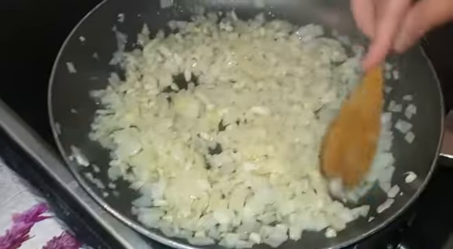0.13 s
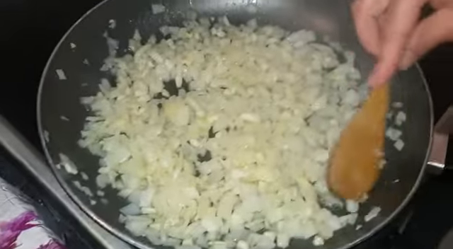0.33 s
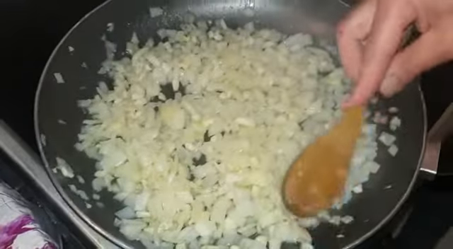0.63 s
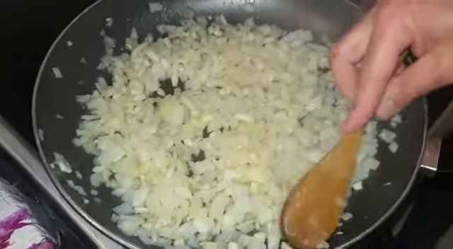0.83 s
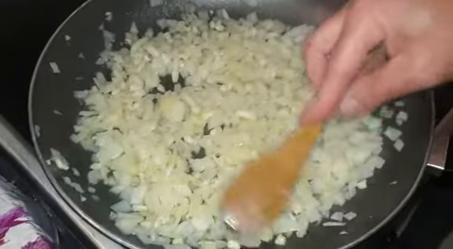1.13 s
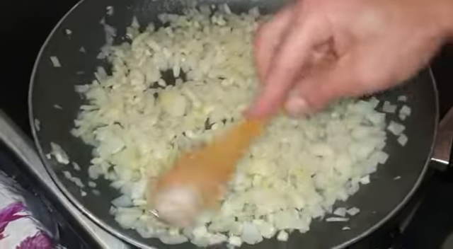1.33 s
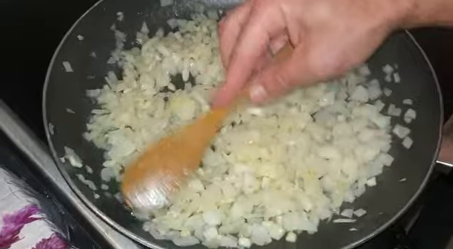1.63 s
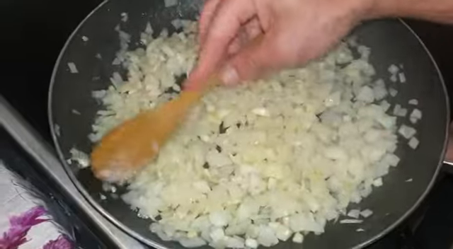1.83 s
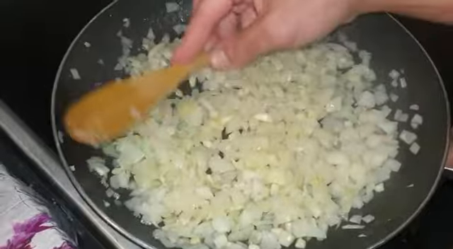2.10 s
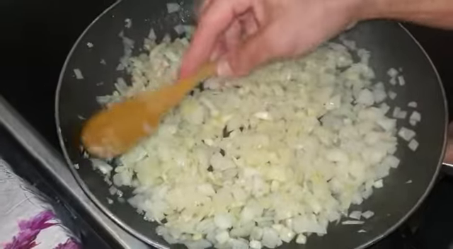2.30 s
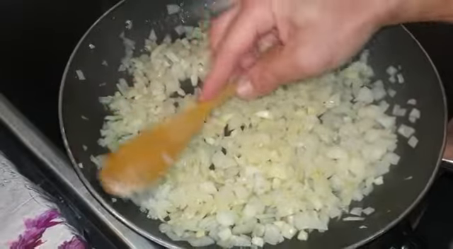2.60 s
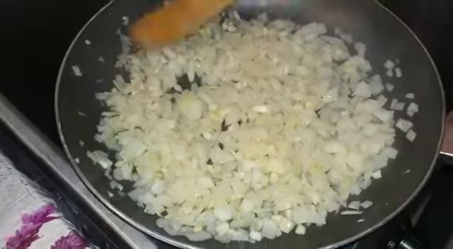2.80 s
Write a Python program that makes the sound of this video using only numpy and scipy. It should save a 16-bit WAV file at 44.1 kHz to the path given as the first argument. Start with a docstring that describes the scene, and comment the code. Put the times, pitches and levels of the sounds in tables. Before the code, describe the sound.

Steady woody knocks on a non-stick pan, soft at first, strongest near the middle, then duller and more rattling; faint steady sizzle and deep rumble beneath, close in a small live room, left channel muffled and very quiet.

```python
"""Spoon knocking on a pan of sizzling onion

A wooden spoon knocks on a heavy non-stick pan of chopped onion, moving round the rim, in a small kitchen.
Knocks: chattering touches excite decaying sines; decaying noise is their reverberation.
Sizzle: random clicks plus hiss, coloured. Rumble: coloured low noise plus a deep hum.
The left microphone is muffled: far quieter and duller.
"""
import sys
import numpy as np
from scipy import signal
from scipy.fft import rfft, irfft
from scipy.io import wavfile

SR = 44100
rng = np.random.default_rng(int(sys.argv[2]) if len(sys.argv) > 2 else 0)


def elevation(decibels):
    """Turn decibel levels (scalar or array-like) into linear amplitude ratios."""
    levels = np.asarray(decibels, float)
    return 10 ** (levels / 20)


def wav_record(signal):
    """Record a signal, one row per channel, as 16-bit PCM in the file named by sys.argv[1]."""
    frames = np.transpose(np.atleast_2d(signal))
    bounded = np.clip(frames, -1, 1)
    # unit amplitude maps onto the largest positive 16-bit level
    quanta = np.round(bounded * 32767).astype(np.int16)
    wavfile.write(sys.argv[1], SR, quanta)


N = 130095   # samples


def rms_one(x):
    """Scale to rms 1."""
    return x / np.sqrt(np.mean(x ** 2) + 1e-20)


def in_time(rows):
    """Read a (time_s, value) table at every sample."""
    time_s, value = np.transpose(rows)
    return np.interp(np.arange(N) / SR, time_s, value)


def at_hz(points, hz):
    """Read a (freq_hz, value) table on a log-frequency axis."""
    freq_hz, value = np.transpose(points)
    return np.interp(np.log(hz), np.log(freq_hz), value)


def drift(rate_hz):
    """Slow random curve of rms 1: noise through a two-pole low-pass, computed every 40 samples."""
    pole = np.exp(-80 * np.pi * rate_hz / SR)
    noise = rng.standard_normal(N // 40 + 2002)
    slow = signal.lfilter([1], [1, -2 * pole, pole * pole], noise)[2000:]   # drop the run-in
    return np.interp(np.arange(N) / 40, np.arange(len(slow)), rms_one(slow))


def steady(source, spectrum, patchy_db):
    """Colour a source; the left gets a muffled, partly alike copy. Right has rms 1 before level drift."""
    # muffling of the left microphone: freq_hz, gain_db
    left_loss = [(25, -19), (60, -28), (270, -27), (450, -20), (1200, -22), (2000, -27), (3300, -31),
                 (5500, -43), (8300, -48), (9200, -25), (10500, -14), (11500, -15), (12000, -42),
                 (13500, -35), (16000, -33)]
    # likeness of left to right: freq_hz, correlation (0-1)
    likeness = [(30, 0.34), (70, 0.23), (150, 0.68), (500, 0.16), (2000, 0.09), (8000, 0.022)]
    cutoff_hz = 15850
    hz = np.maximum(np.arange(N // 2 + 1) * SR / N, 1)
    shape = elevation(at_hz(spectrum, hz)) * (hz < cutoff_hz)
    right = rfft(source)
    other = rfft(rng.standard_normal(N))
    alike = np.clip(at_hz(likeness, hz), 0, 1)
    left = (alike * right + np.sqrt(1 - alike ** 2) * other) * elevation(at_hz(left_loss, hz))
    both = irfft(np.array([left, right]) * shape, N)
    return both / both[1].std() * elevation(patchy_db * drift(rate_hz=5.3))


def sizzle():
    """Dense tiny bursts of steam in the fat: random clicks on a smooth hiss."""
    # right-side level before output gain: time_s, level_db
    sizzle_level = [(0, -57), (.8, -56.5), (1.6, -57), (2.0, -52), (2.5, -52.5), (2.95, -52)]
    # relative spectrum: freq_hz, density_db_per_hz
    sizzle_spectrum = [(760, -11), (1300, -15.5), (1590, -10), (1780, -7.5), (1980, -7), (2130, -3.5),
                       (2320, -9.5), (2470, -8), (6420, -1), (8430, -12.5), (10200, -9.5), (14900, -8.5),
                       (16000, -18)]
    crackles_per_s, spread_db = 5100, 2
    crackle_share = 0.45   # of power
    size_db = spread_db * np.minimum(rng.exponential(1, N), 5)
    sizes = elevation(size_db) * rng.choice([-1, 1], N)
    crackle = rms_one(sizes * (rng.random(N) < crackles_per_s / SR))
    hiss = rng.standard_normal(N)
    source = np.sqrt(crackle_share) * crackle + np.sqrt(1 - crackle_share) * hiss
    return elevation(in_time(sizzle_level)) * steady(source, sizzle_spectrum, patchy_db=.2)


def rumble():
    """Flame and house: coloured low noise of uneven level, with a faint deep sine hum."""
    # right-side level before output gain: time_s, level_db
    rumble_level = [(0, -56.5), (.7, -55), (1.5, -52.5), (1.95, -48.5), (2.4, -53.5), (2.95, -50.5)]
    # relative spectrum: freq_hz, density_db_per_hz
    rumble_spectrum = [(30, -62), (42, -33), (54, -14), (64, -1.5), (76, -1), (92, -8), (124, -12),
                       (160, -22), (250, -21.5), (394, -38), (650, -36), (1100, -42.5), (1600, -54),
                       (2200, -59), (3300, -120)]
    hum_hz, hum_rms_db, hum_left_db = 28.8, -70, -31   # left relative to right
    phase = 2 * np.pi * hum_hz * np.arange(N) / SR + rng.uniform(0, 2 * np.pi)
    hum = elevation(hum_rms_db) * np.sqrt(2) * np.sin(phase)
    noise = steady(rng.standard_normal(N), rumble_spectrum, patchy_db=3.5)
    return elevation(in_time(rumble_level)) * noise + hum * elevation([[hum_left_db], [0]])


def ring(clicks, hz, t60_s):
    """Two-pole resonator: a unit click starts a decaying sine of height 1."""
    r = elevation(-60 / (t60_s * SR))
    w = 2 * np.pi * hz / SR
    return signal.lfilter([0, np.sin(w)], [1, -2 * r * np.cos(w), r * r], clicks + 1e-18)


def spoon_touches(chatter_db, span):
    """Contact clicks of one knock: a first touch, then eleven weakening ones of random sign."""
    count, chatter_s, delay_s = 11, .011, .0008
    loss_db, spread_db = .6, 1.5   # per touch
    later_s = (np.arange(count) + rng.random(count)) / count * chatter_s + delay_s
    fall_db = loss_db * np.arange(count)
    later_db = min(chatter_db, -2) - fall_db + rng.normal(0, spread_db, count)
    when_s = np.r_[0, later_s]
    size = -elevation(np.r_[0, later_db]) * np.r_[1, rng.choice([-1, 1], count)]
    touches = np.zeros(span)
    np.add.at(touches, (when_s * SR).astype(int), size)
    return touches


def knocks():
    """Touches excite wooden clack, edge tick and pan modes; close low modes swell, then choke each other.
    Returns the upper part, the low ring and the broad pulse that fills the room."""
    # knocks: start_s, clack_db, clack_pitch_hz, low_ring_db, chatter_db (capped at -2); before output gain
    knock_rows = [(0.087, -35, 1570, -48.5, -1.5), (0.290, -26.5, 1530, -38.5, 0.5),
                  (0.512, -23, 1670, -44, -0.5), (0.752, -17.5, 2140, -58, -7),
                  (0.889, -36, 1700, -55.5, -3.5), (1.056, -16, 1980, -49, -8),
                  (1.250, -15, 2010, -43.5, -9.5), (1.426, -20, 1780, -38, -2),
                  (1.775, -27, 1710, -39.5, 3.5), (2.008, -24.5, 1710, -41, -3),
                  (2.217, -21.5, 1930, -33, -2), (2.464, -34, 1400, -39, -0.5)]
    # low modes of pan and hob: freq_hz, mean_level_db, t60_s, signed_gain
    pan_low = [(160.3, 9, 0.29, 0.49), (170.1, 0, 0.35, -1.38), (190, 6, 0.1, 0.68),
               (244.2, -15.5, 0.47, 0.74), (250.8, -12.5, 0.75, -0.97), (318.7, -6.5, 0.51, 0.14)]
    # upper pan modes: mean_freq_hz, mean_level_db (against the clack), t60_s
    pan_high = [(421, -15, .05), (584, -15, .045), (668, -14, .045), (760, -16, .04), (958, -12, .04),
                (1040, -13, .04), (1160, -12, .04), (1330, -12, .03), (1575, -8, .035), (1795, -7, .03),
                (2008, -8, .03), (2290, -10, .028), (2650, -16, .025), (2950, -17, .025), (4300, -16, .02)]
    # path round the rim: time_s, edge_tick_db, low_ring_share_above_190_hz_db
    rim_path = [(0, -9.5, 2), (.5, -6.5, -1), (.75, -12, -2), (1.1, -12.5, 19), (1.43, -9.5, 2),
                (1.75, -50, 1.5), (2.2, -11, -9.5), (2.5, -25, -3)]
    clack_cycles, clack_db = 14.0, 7.0   # cycles per t60; level against the modes
    tick_mean_hz, tick_t60_s = 4800, .0014
    soft_above = 1.4   # contact low-pass corner over clack pitch
    out = np.zeros((3, N + SR))
    span = SR // 2
    first = np.zeros(span)
    first[0] = 1
    rim_s, rim_tick_db, rim_upper_db = np.transpose(rim_path)
    for start_s, db, clack_hz, low_db, chatter_db in knock_rows:
        touches = spoon_touches(chatter_db, span)
        corner_hz = soft_above * clack_hz
        soft = signal.butter(4, corner_hz, fs=SR, output="sos")

        high = elevation(clack_db) * ring(touches, clack_hz, clack_cycles / clack_hz)
        for hz, level_db, t60_s in pan_high:
            gain = elevation(level_db + rng.normal(0, 2.1))
            high = high + gain * ring(touches, hz * rng.normal(1, .015), t60_s)
        high = signal.sosfilt(soft, high)
        # energy ten times that of the touches
        high = high / np.sqrt(np.sum(high ** 2) / np.sum(touches ** 2) / 10)
        tick = ring(touches, tick_mean_hz * rng.normal(1, 0.033), tick_t60_s)
        high = high + elevation(np.interp(start_s, rim_s, rim_tick_db)) * tick

        upper_db = np.interp(start_s, rim_s, rim_upper_db)
        low = np.zeros(span)
        for hz, level_db, t60_s, sign in pan_low:
            gain = sign * elevation(level_db + upper_db * (hz > 190) + rng.normal(0, 1.0))
            low = low + gain * ring(first, hz, t60_s)

        # pulse energy close to that of the upper part
        pulse = signal.sosfilt(soft, first) * np.sqrt(np.sum(high ** 2) * SR / (2 * corner_hz))
        start = int(start_s * SR)
        out[:, start:start + span] += [elevation(db) * high, elevation(low_db) * low, elevation(db) * pulse]
    return signal.sosfilt(signal.butter(2, 130, "high", fs=SR, output="sos"), out[:, :N])


def kitchen(x):
    """Reverberation: noise that builds up fast and dies band by band, independent for two outputs."""
    # decay: freq_hz, t60_s (floored at .05 when read)
    room_t60 = [(300, 0.39), (700, 0.45), (1800, 0.4), (3000, 0.41), (6000, -2.8)]
    # relative band level: freq_hz, level_db
    room_colour = [(200, 6), (350, 1), (700, -3), (1200, -5), (1800, -6.5), (2500, -18), (3200, 2.5),
                   (6000, -21)]
    room_db, build_s = -8.5, .003
    t = np.arange(SR // 2) / SR
    edges_hz = 100 * 2 ** np.arange(0, 7, .5)
    white = rng.standard_normal((2, 2, len(t)))   # neighbouring bands alternate between two noises
    tail = 0
    for k, (low_hz, high_hz) in enumerate(zip(edges_hz, edges_hz[1:])):
        hz = np.sqrt(low_hz * high_hz)
        band_pass = signal.butter(2, [low_hz, high_hz], "band", fs=SR, output="sos")
        band = signal.sosfilt(band_pass, white[k % 2])
        t60_s = max(at_hz(room_t60, hz), .05)
        tail = tail + band * elevation(at_hz(room_colour, hz) - 60 * t / t60_s)
    tail = tail * (1 - np.exp(-(t / build_s) ** 2))
    tail = tail / np.sqrt(np.sum(tail ** 2, axis=1, keepdims=True))
    return elevation(room_db) * signal.fftconvolve(x[None], tail, axes=1)[:, :N]


def scene():
    """Knocks with their room, dulled on the left, over sizzle and rumble."""
    left_knock_db, left_low_db, left_room_db = -24.5, -26.0, -25.0
    left_lag_s, left_cut_hz = .00001, 3000
    room_likeness = .45   # left to right, before muffling
    ringing_share = 0.37   # of the upper part in what fills the room
    output_gain_db = 7.5
    high, low, pulse = knocks()
    other, room = kitchen(pulse + ringing_share * high)
    left_room = room_likeness * room + np.sqrt(1 - room_likeness ** 2) * other
    left = elevation(left_knock_db) * high + elevation(left_low_db) * low + elevation(left_room_db) * left_room
    late = np.interp(np.arange(N) - left_lag_s * SR, np.arange(N), left)
    muffled = signal.sosfilt(signal.butter(4, left_cut_hz, fs=SR, output="sos"), late)
    knocking = np.array([muffled, high + low + room])
    return elevation(output_gain_db) * (knocking + sizzle() + rumble())


def band_limit(x):
    """A steep low-pass at the top of the band."""
    return signal.sosfilt(signal.butter(12, 16600, fs=SR, output="sos"), x)


def record(dry):
    """Deliver the finished mix."""
    return band_limit(dry)


dry = scene()
out = record(dry)
wav_record(out)
```